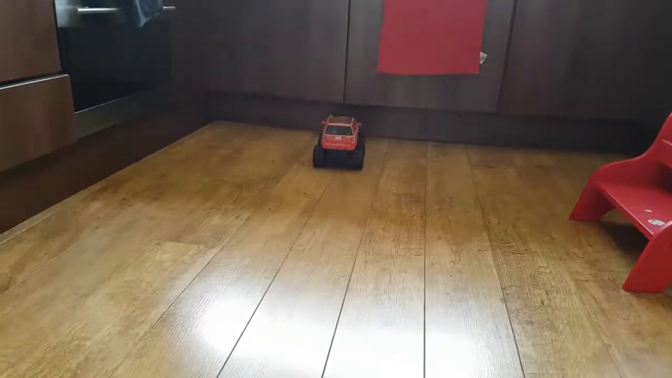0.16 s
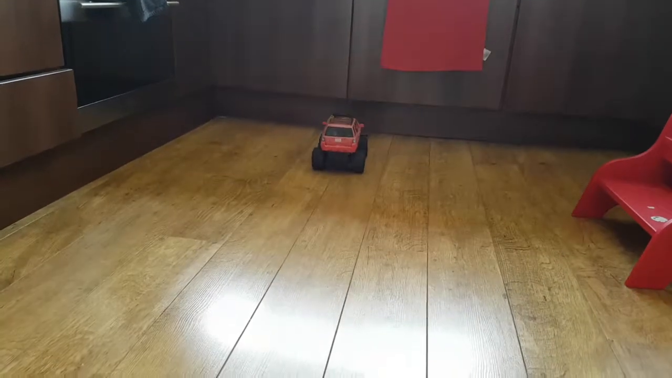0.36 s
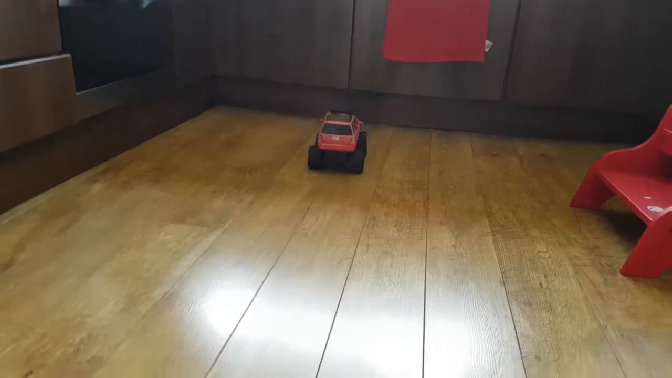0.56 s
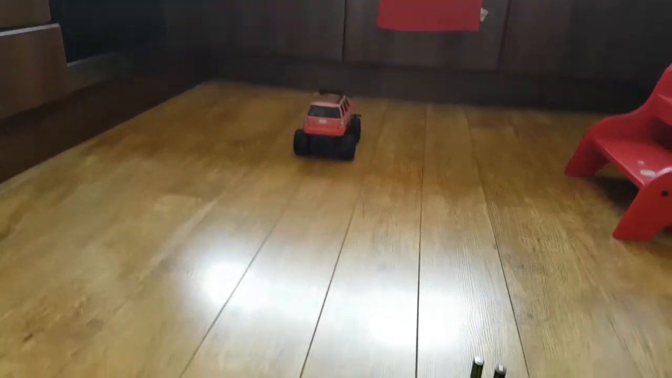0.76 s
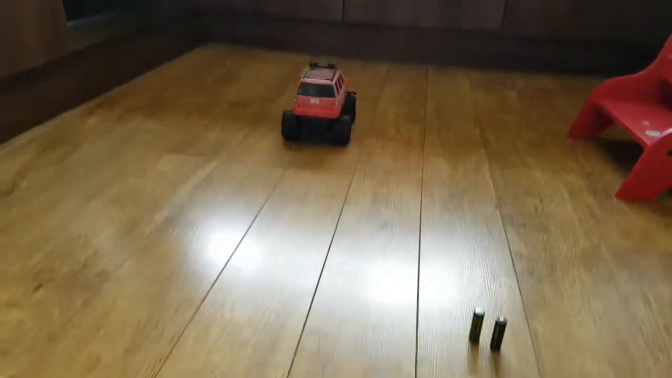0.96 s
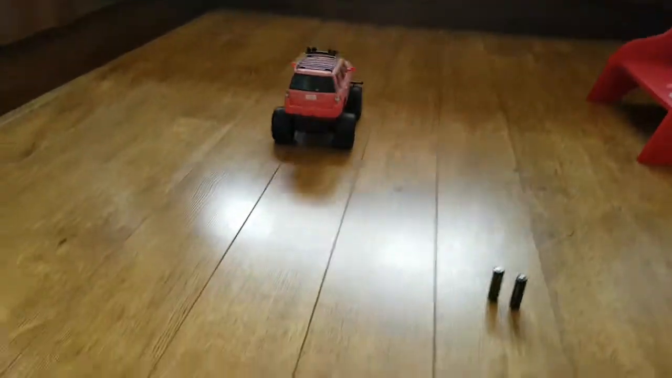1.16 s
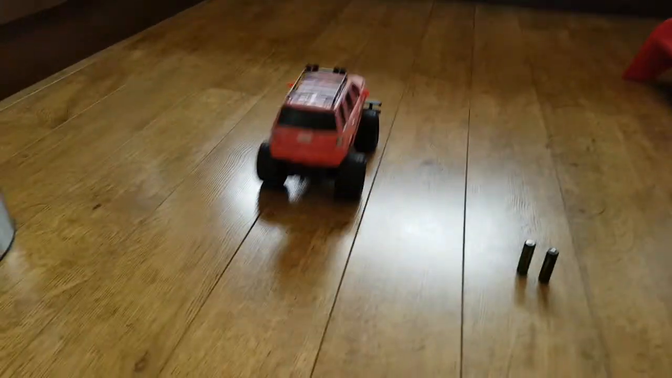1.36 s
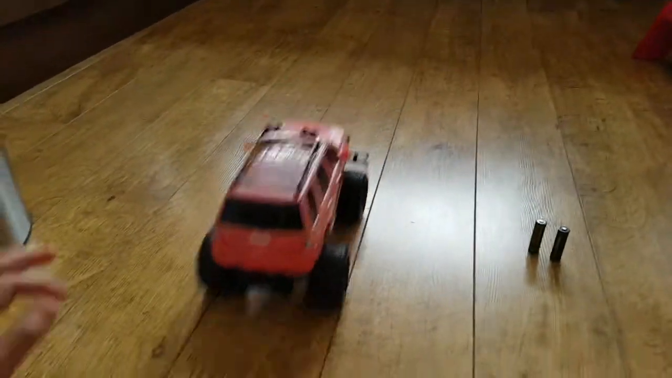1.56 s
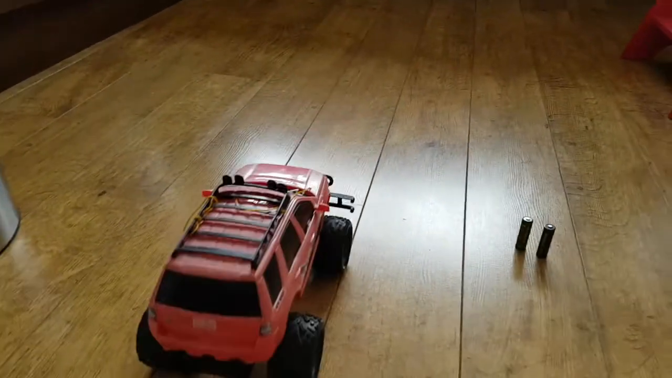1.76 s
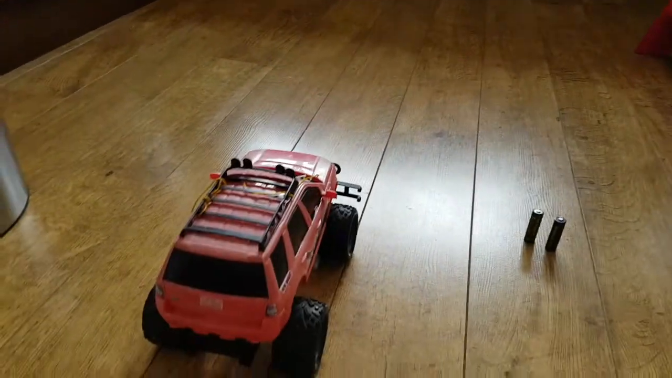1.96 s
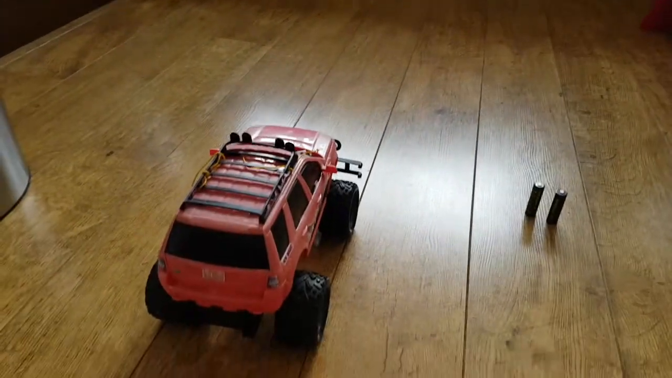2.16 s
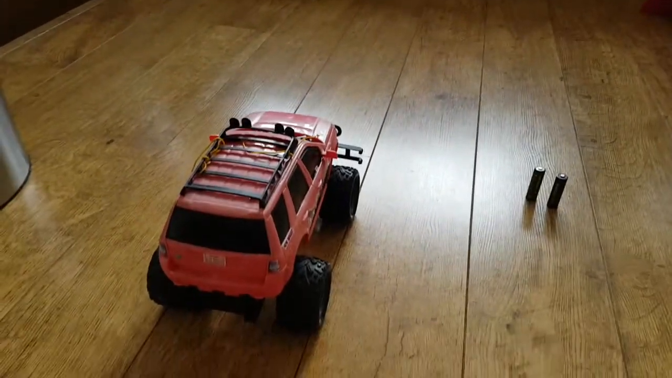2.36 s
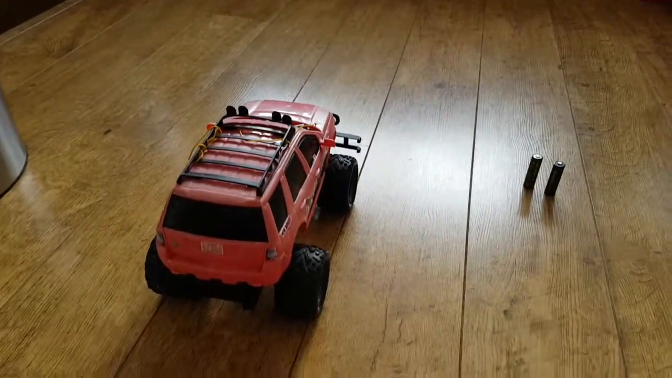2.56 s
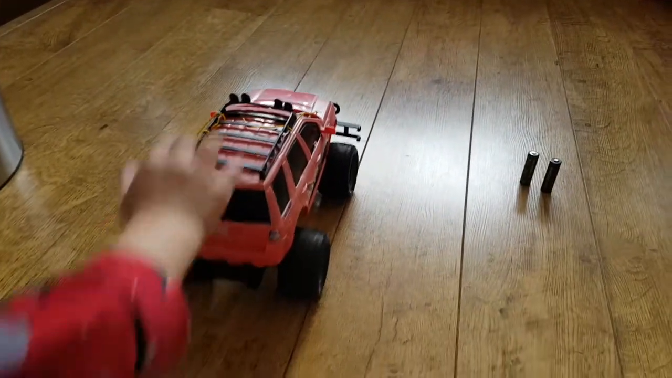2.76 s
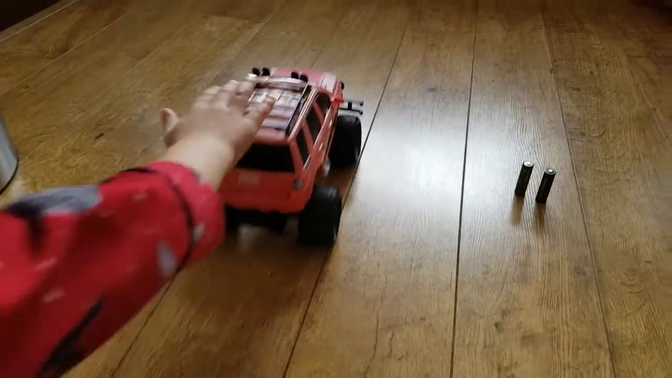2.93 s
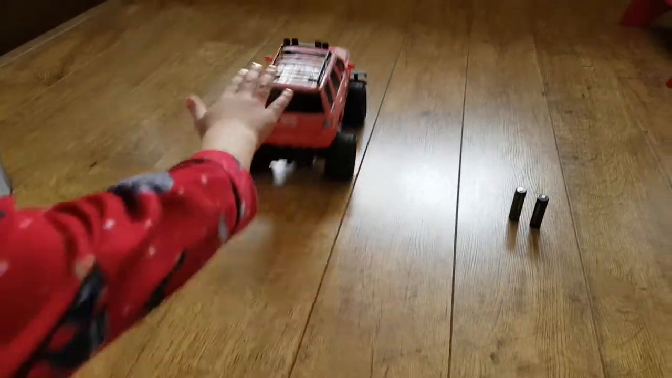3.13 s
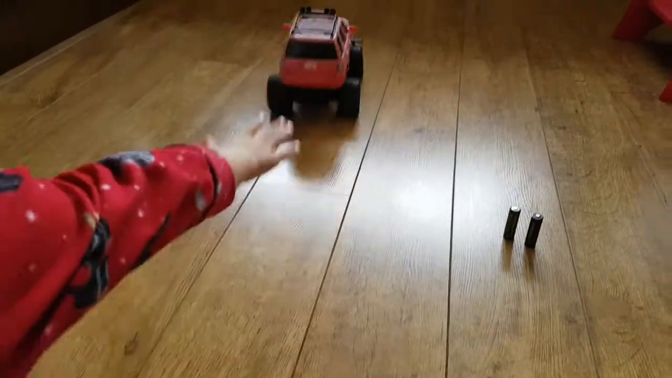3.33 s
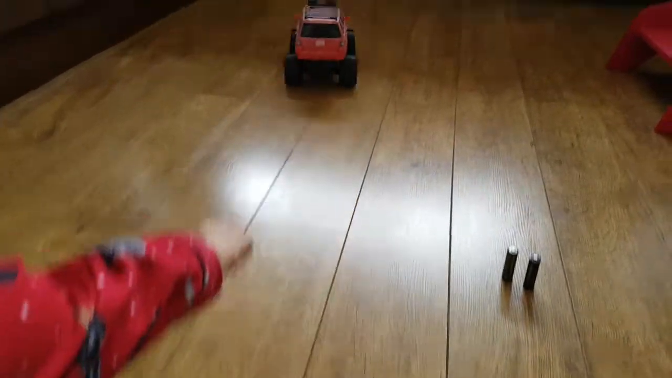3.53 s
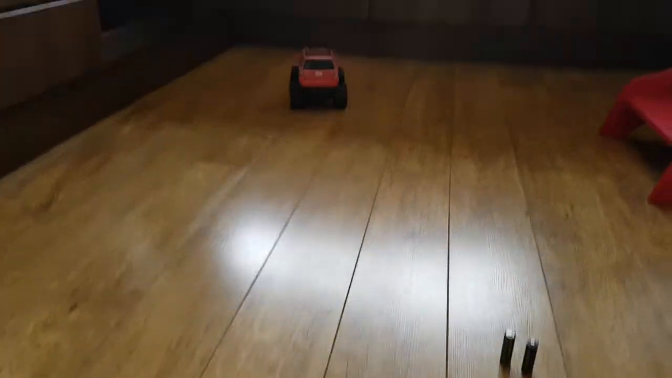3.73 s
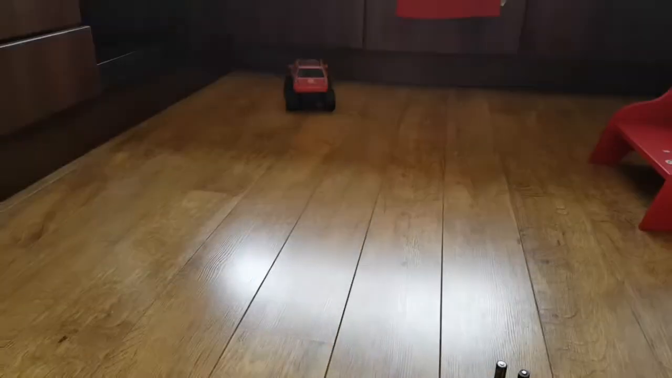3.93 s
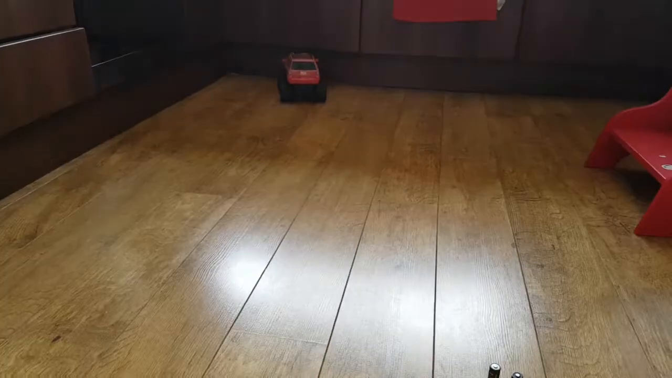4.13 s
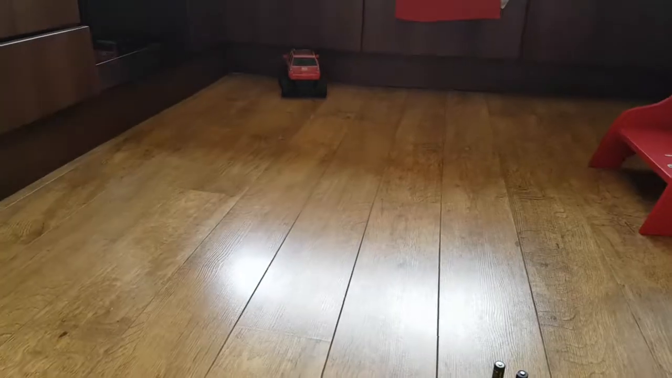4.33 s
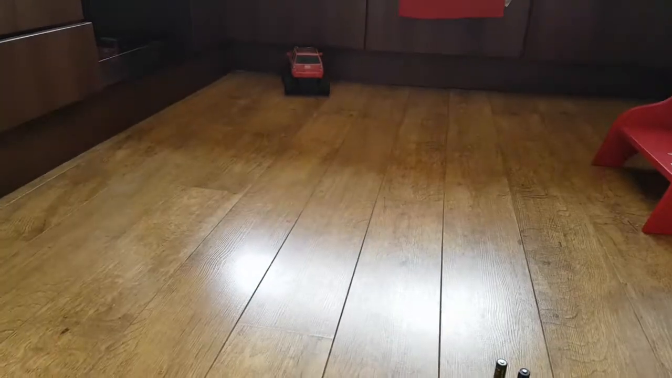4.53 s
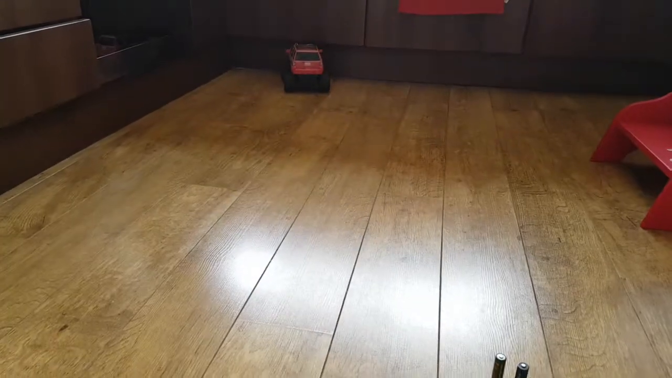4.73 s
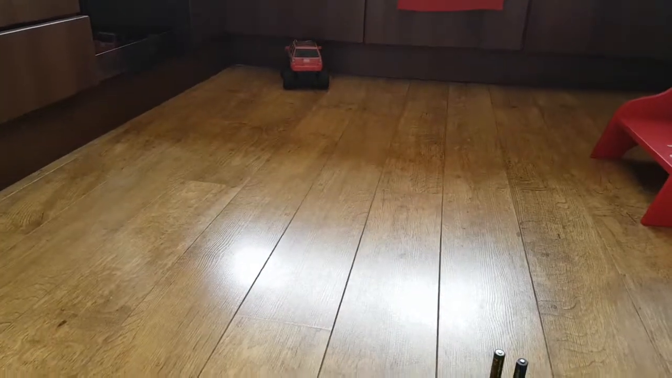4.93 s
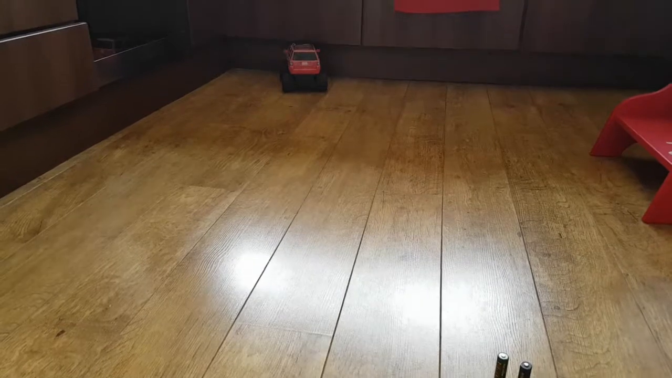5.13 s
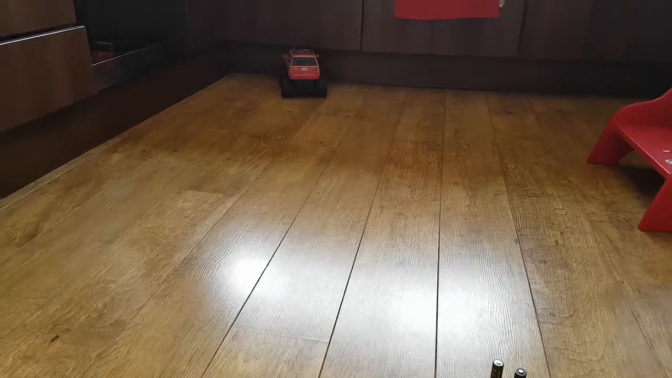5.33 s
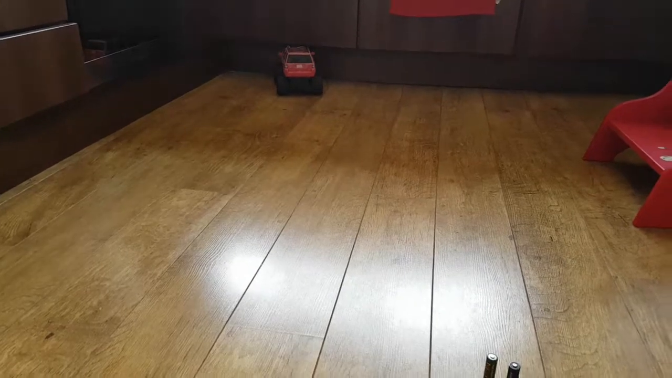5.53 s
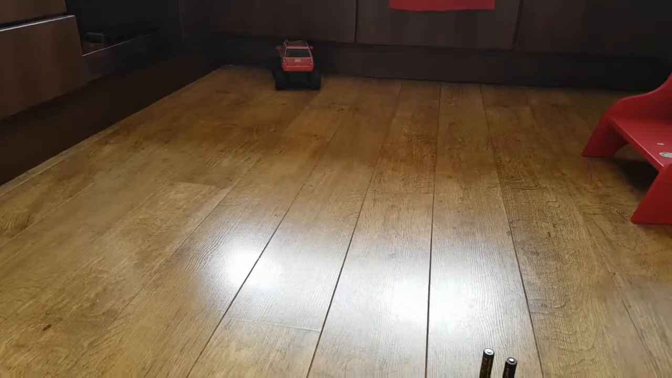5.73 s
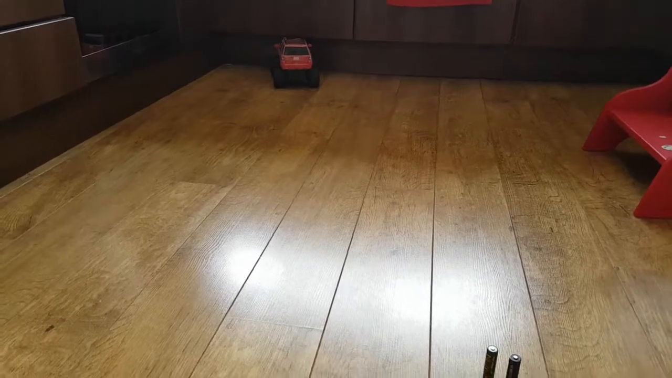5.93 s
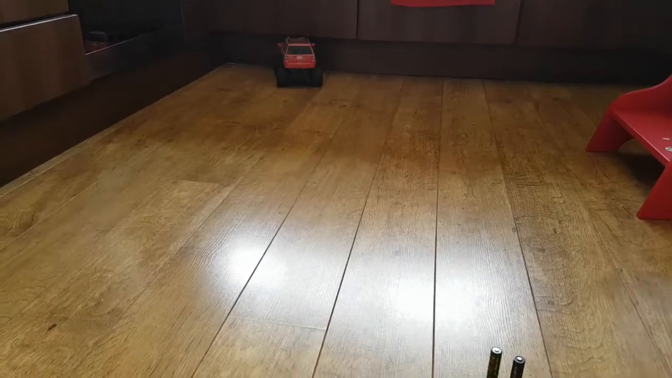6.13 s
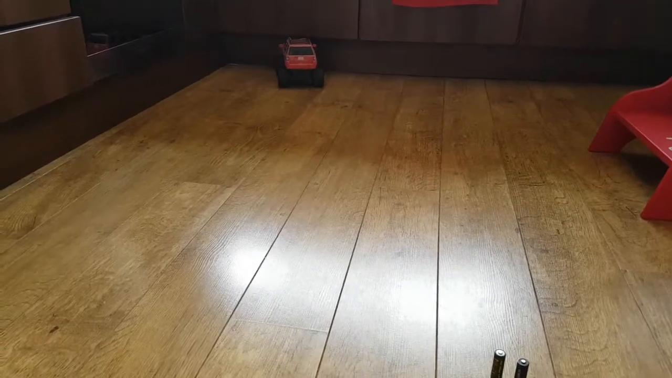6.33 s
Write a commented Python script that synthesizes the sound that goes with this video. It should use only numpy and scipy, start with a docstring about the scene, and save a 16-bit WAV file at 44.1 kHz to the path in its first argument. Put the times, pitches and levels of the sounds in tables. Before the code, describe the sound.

A toy truck's electric motor gives four quick blips, then whirs closer over a wooden kitchen floor, plastic gears chattering and tyres rumbling softly. It clacks and coasts to a stop with a slight squeal. After a pause it drives away with a rising whine and a brief whistle, then winds down. Faint sleeve rustles, ticks and dull thumps follow, heard in a small room, slightly to the left.

```python
"""A kitchen with a wooden floor. A toy radio-controlled truck gives four short blips, backs closer,
coasts to a stop with a squealing axle, then drives off with a whistling gear. Its plastic gears chatter
and whine in the hollow shell, louder with speed and throttle; the motor hums and the tyres rumble.
The drive clacks as it takes up slack. A sleeve brushes the floor, and light ticks, soft scuffs and
dull thumps on the boards end the scene."""
import sys
import numpy as np
from scipy import signal
from scipy.fft import rfft, irfft, next_fast_len
from scipy.io import wavfile
from scipy.ndimage import map_coordinates

SR = 44100
rng = np.random.default_rng(int(sys.argv[2]) if len(sys.argv) > 2 else 0)


def generate_wav(sig):
    """Save sig (samples, or channels by samples) to the path in sys.argv[1] as 16-bit PCM at SR."""
    pcm = np.round(np.clip(np.atleast_2d(sig).T, -1, 1) * 32767).astype(np.int16)
    wavfile.write(sys.argv[1], SR, pcm)


N = 281799

# The throttle: four blips, two long presses. Each row: on and off in seconds, added gear level in dB.
PRESSES = [(.045, .15, 3), (.245, .325, 4.5), (.435, .55, 5.5), (.61, .735, 4), (0.801, 1.337, 5.5),
           (2.66, 3.6, 3)]
# How fast the gear teeth meet in the two long runs. Each row: time in seconds, tooth rate in Hz.
RUN_IN = [(.79, 1051), (.84, 1599), (1.0, 1799), (1.13, 1797), (1.25, 1910), (1.31, 1902), (1.365, 1331),
          (1.48, 1281), (1.55, 876), (1.63, 722), (1.71, 451.8), (1.81, 260.2)]
RUN_OUT = [(2.66, 399.6), (2.75, 559), (2.87, 690.6), (3.07, 1236), (3.22, 1351), (3.42, 1687),
           (3.61, 1928), (3.67, 1379), (4.09, 884.2), (4.25, 579.2), (4.31, 370.8), (4.48, 211)]
# The gears with the throttle off. Each row: tooth rate in Hz, level in dB.
GEAR_LOUDNESS = [(200, -72.5), (400, -53), (600, -43), (800, -37), (1100, -31.5), (1400, -30), (1900, -28)]
# Backing in and driving off use opposite sides of the teeth. Each row: start and stop in seconds, then
# in dB against the chatter: rasp, sizzle, extra treble under load, hum, extra whine under load.
TRIPS = [(0, 1.81, -5.5, -5.5, 3, -11, -4), (2.66, 4.5, -4.5, -6, -1.04, -19.5, 2)]
# The tone colour of the truck's parts. Each row: frequency in Hz, level in dB.
SHELL_COLOUR = [(200, -41), (340, -9.5), (520, -11), (650, -11), (930, -8), (1300, -3), (1700, -4),
                (2050, -0.5), (2650, -6), (3200, -15.5), (4100, -19), (5200, -25), (9000, -56)]  # the broad ring of the plastic shell
GEARBOX_COLOUR = [(1500, -29.5), (2400, -10), (2900, 10), (3300, 3.5), (3800, -4), (4300, -13.5),
                  (5000, -13.5), (8000, -40)]  # a narrow, rasping ring
SIZZLE_COLOUR = [(1500, -45), (3000, -14.5), (4200, 0), (5200, 3.5), (6500, 3), (7800, 1), (8800, -9),
                 (10200, -7.5), (12500, -1.5), (14000, -7), (16000, -13.5)]  # the bright ring of hard tooth contacts
TYRE_COLOUR = [(40, -32.5), (80, -7.5), (115, -3.5), (150, -9.5), (210, -6.5), (270, -21.5), (500, -19.5),
               (1000, -46.5)]  # a low rumble
# Notes at which the body panels ring. Each row: frequency in Hz, width in Hz, boost in dB.
PANEL_NOTES = [(618, 43, 6), (1332, 34, 3.5), (1568, 23, 4), (1693, 64, 5.5), (1920, 55, 5), (2850, 60, 3),
               (3090, 86, 3), (3590, 120, 2), (4040, 43, 2.5), (7800, 180, 2)]
# The shell favours some pitches of the whine. Each row: tooth rate in Hz, level in dB.
WHINE_LEVELS = [(450, -7), (600, -3), (760, -1), (900, -10.5), (1150, -7), (1310, 2), (1500, -2),
                (1680, -1), (1900, -1.5)]
# How far off the truck is, used for the whine. Each row: time in seconds, distance in metres.
DISTANCE = [(0, 1.7), (.75, 1.2), (1.6, 0.19), (2.95, 0.4), (3.25, 0.66), (3.8, 1.89), (4.3, 1.67)]
# Tyres rolling on the boards. Each row: time in seconds, level in dB.
TYRE_LEVELS = [(0, -66), (.06, -53), (1.0, -51), (1.4, -47.5), (1.75, -56.5), (1.81, -71), (2.66, -60.5),
               (2.88, -47.5), (3.62, -50.5), (3.73, -43.5), (4.14, -51.5), (4.45, -73.5)]
# Plastic clacks and ticks. Each row: start in seconds, level in dB, treble offset in dB,
# seconds to fade by 60 dB.
CLACKS = [(.053, -21, -16, 0.086), (.247, -21, -16, 0.089), (.435, -19.5, -15, 0.08), (.8, -20, -13, 0.075),
          (1.422, -20.5, -24.5, .06), (1.522, -18.5, -20, 0.052), (1.814, -45, -20.5, 0.13),
          (2.452, -43.5, -12.5, 0.017), (2.547, -38.5, -22, .02), (2.658, -30.5, -24, 0.062),
          (2.664, -29, -14.5, 0.028), (4.259, -34.5, -25, .03), (4.335, -32.5, -23, 0.02),
          (4.394, -48.5, -27, 0.029), (4.538, -58, -8, 0.0136), (5.026, -40, -16.5, 0.022),
          (5.551, -41, -23, 0.027), (5.578, -40, -18, 0.0211), (5.732, -37, -21.5, 0.0193),
          (6.164, -48, -21, 0.056), (6.346, -52, -21, 0.11)]
# The axle's squeal and the gear's whistle. Each row: time in seconds, pitch in Hz, level in dB.
AXLE_SQUEAL = [(1.53, 2100, -62), (1.585, 2190, -46), (1.65, 2315, -42.5), (1.69, 2380, -46.5),
               (1.74, 2300, -55), (1.79, 2200, -78)]
GEAR_WHISTLE = [(2.9, 2984, -61), (2.97, 3168, -37.5), (3.05, 3420, -40), (3.125, 4092, -36),
                (3.3, 4170, -41), (3.37, 4190, -66)]
# The tones that make up the squeal. Each row: multiple of the pitch, level in dB.
AXLE_TONES = [(1, -2.5), (2, -14), (3, -9), (5.5, -3)]
# Strokes of a sleeve on the floor. Each row: start and end in seconds, level in dB.
BRUSHES = [(2.57, 2.633, -60.5), (5.0, 5.11, -63), (5.271, 5.42, -73.5), (5.42, 5.647, -64),
           (5.738, 6.073, -68.5), (6.176, 6.379, -75)]
# Dull thumps. Each row: start in seconds, level in dB.
THUMPS = [(5.042, -43), (5.076, -43.5), (6.026, -34.5), (6.064, -41.5), (6.16, -43)]
# The floorboards' low notes. Each row: pitch in Hz, level in dB, seconds to fade by 60 dB.
BOARD_NOTES = [(60.5, -9.5, 0.37), (77.8, -3, 0.29), (108.1, 1, 0.062), (153, -9, 0.11)]
# Soft scuffs. Each row: middle in seconds, level in dB, half the length in seconds.
SCUFFS = [(5.476, -55, 0.022), (5.607, -55.5, 0.021), (6.374, -64, 0.025)]
# The tone colour of the sleeve, the scuffs and the quiet room. Each row: frequency in Hz, level in dB.
CLOTH_COLOUR = [(300, -4.5), (1200, -0.5), (2500, -1.5), (4500, -5.5), (7500, -6.5), (9500, -14.5),
                (13000, -7), (16000, -12.5)]
SCUFF_COLOUR = [(200, -8), (550, 2), (1000, -6), (1500, -11), (2200, -6), (5000, -16.5), (9000, -35),
                (16000, -37)]
AIR_COLOUR = [(25, -8), (55, -1), (75, -10), (110, -11.5), (150, -15.5), (220, -15), (260, -17),
              (330, -17.5), (600, -24.5), (1500, -30), (4000, -37.5), (9000, -47.5), (13000, -40.5),
              (16000, -46.5)]
# How long the kitchen echoes. Each row: frequency in Hz, seconds to fade by 60 dB.
ECHO_TIMES = [(100, 0.89), (1000, 0.32), (4000, 0.23), (14000, 0.21)]
# How strong the echo is. Each row: frequency in Hz, level in dB against the direct sound.
ECHO_LEVELS = [(100, -17), (300, -6), (700, 0.5), (2000, -3.5), (5000, -0.5), (14000, 4)]
# The sound leans mostly left. Each row: frequency in Hz, left minus right in dB.
LEFT_LEAN = [(100, 0.5), (300, 2), (600, 1.65), (1400, 2.3), (2800, 1.5), (5000, -0.5), (9000, -3),
             (13000, 4)]

CREEP_HZ, BLIP_HZ, BLIP_STEP_HZ = 569.3, 1496, 85  # tooth rate: at the start, first blip's aim, step up
FULL_SPEED_HZ, TEETH_PER_HUM = 1800, 4.47  # tooth rate at full speed; teeth per cycle of the motor's hum
# Growth with speed; one octave is a doubling of the tooth rate.
RASP_DB_PER_OCTAVE, SIZZLE_DB_PER_OCTAVE, WHINE_DB_PER_OCTAVE, HUM_DB_PER_OCTAVE = 1.1, 4, 3, 29.5
STRAIN_DB_PER_OCTAVE = 2  # a slower motor pushes harder
NEAR_M, WHINE_LOSS_DB_PER_M = 0.65, 7.5  # further off, the coasting whine sinks into the chatter
AIR_DB, TOP_HZ = -60, 15900


def amp(db):
    """Turn decibels into a number to multiply by."""
    return 10 ** (np.asarray(db) / 20)


def unit(x):
    """Scale a signal to an average power of 1."""
    return x / np.sqrt(np.mean(x ** 2) + 1e-20)


def along(points, hz):
    """Look up a table at any frequency, sliding between its rows on a pitch scale."""
    freqs, values = np.transpose(points)
    return np.interp(np.log(hz + 1), np.log(freqs + 1), values)


def curves(rows):
    """Turn each column after the time into a curve with one value per sample."""
    times, *columns = np.transpose(rows)
    return [np.interp(np.arange(N) / SR, times, column) for column in columns]


def wobble(rate):
    """A smooth random curve through `rate` new values a second."""
    values = rng.standard_normal(int(N * rate / SR) + 4)
    return unit(map_coordinates(values, [np.arange(N) * rate / SR]))


def held(start, end, rise_s, fall_s):
    """A level that climbs towards 1 from start and dies away after end."""
    t = np.arange(N) / SR
    rise = 1 - np.exp(-np.clip(t - start, 0, max(end - start, 0)) / rise_s)
    return rise * np.exp(-np.maximum(t - end, 0) / fall_s)


def stereo_noise(size, width):
    """Noise for two ears: the same in both at width 0, unrelated at width 1."""
    mid, side = rng.standard_normal((2, size))
    return np.array([mid + width * side, mid - width * side])


def filtered(x, response):
    """Turn each frequency up or down by the gain that response gives for it."""
    size = next_fast_len(N + SR // 2)
    return irfft(rfft(x, size) * response(np.fft.rfftfreq(size, 1 / SR)), size)[..., :N]


def ring(x, colour, notes=(), size=4096):
    """Let x shake a body that has a broad tone colour and, if given, sharp ringing notes."""
    f = np.fft.rfftfreq(size, 1 / SR)
    notes_db = sum(db / (1 + (2 * (f - hz) / width) ** 2) for hz, width, db in notes)
    cepstrum = irfft(np.log(amp(along(colour, f) + notes_db)))
    # Folding this onto its first half makes the body ring after a blow, never before.
    cepstrum[1:size // 2] *= 2
    cepstrum[size // 2 + 1:] = 0
    body = irfft(np.exp(rfft(cepstrum)))
    return signal.fftconvolve(np.atleast_2d(x), body[None] / np.linalg.norm(body), axes=1)[:, :N]


def tooth_rate():
    """Teeth meeting per second: each blip spins the motor up and lets it slow; two long runs follow."""
    t = np.arange(N) / SR
    blips = [(on, off) for on, off, _ in PRESSES if off - on < .3]
    rates = [(BLIP_HZ + k * BLIP_STEP_HZ) * held(on, off, rise_s=.036, fall_s=.14)
             for k, (on, off) in enumerate(blips)]
    rates += [np.interp(t, *np.transpose(run), left=0, right=0) for run in (RUN_IN, RUN_OUT)]
    rates.append(np.where(t < RUN_IN[0][0], CREEP_HZ, GEAR_LOUDNESS[0][0]))  # the slowest allowed
    return np.max(rates, axis=0)


def tooth_blows(teeth_passed, scatter, uneven_db, rebound, lag_s):
    """One blow per tooth, early or late and of uneven size; loose teeth strike again on their backs."""
    teeth = np.arange(1, int(teeth_passed[-1]))
    blows = np.zeros((2, N))
    for offset, force in (0, 1), (.5, -rebound):
        when, size, place = rng.standard_normal((len(teeth), 3)).T
        at = np.interp(teeth + offset + scatter * when if offset == 0 else teeth + offset + when,
                       teeth_passed, np.arange(N))
        # Each blow leaves the shell at another spot, so one ear hears it about lag_s sooner.
        for ear, side in enumerate((.5, -.5)):
            arrival = np.clip(at + side * lag_s * SR * place, 0, N - 1).astype(int)
            blows[ear] += force * np.bincount(arrival, amp(uneven_db * size), N)
    return unit(blows / np.sqrt(np.abs(np.gradient(teeth_passed)) + 1e-6))  # equal power at any speed


def gear_whine(teeth_passed, tooth_hz, throttle):
    """The note of the meeting teeth: clearest when coasting close by, blurred by load and distance."""
    beyond_m = np.maximum(curves(DISTANCE)[0] - NEAR_M, 0)
    blur = .4 + .8 * throttle + .5 * beyond_m
    jitter = wobble(300) + .5 * np.array([wobble(250), wobble(250)])
    phase = 2 * np.pi * teeth_passed + blur * jitter
    tones = np.sin(phase) + amp(-12.5) * np.sin(2 * phase) + amp(-17.5) * np.sin(3 * phase)
    flutter = amp(3 * wobble(130) + 2 * wobble(30))
    loss_db = WHINE_LOSS_DB_PER_M * beyond_m * (1 - throttle)
    return amp(along(WHINE_LEVELS, tooth_hz) - loss_db) * unit(tones * flutter)


def motor_hum(tooth_hz):
    """The motor hums one cycle for every few teeth, and its level wavers."""
    phase = 2 * np.pi * np.cumsum(tooth_hz / TEETH_PER_HUM) / SR + .55 * wobble(110)
    return unit((np.sin(phase) + amp(-13) * np.sin(2 * phase)) * amp(1.8 * wobble(55)))


def tyre_rumble():
    """Tyres roll over the boards with a low, uneven noise."""
    bumps = stereo_noise(N, width=.091) * amp(.82 * wobble(35))
    return amp(curves(TYRE_LEVELS)[0]) * unit(ring(bumps, TYRE_COLOUR))


def drive():
    """Gears and motor, louder and brighter with speed and throttle, over the rumbling tyres."""
    tooth_hz = tooth_rate()
    octaves = np.log2(tooth_hz / FULL_SPEED_HZ)
    presses = np.array([held(on, off, rise_s=.014, fall_s=.031) for on, off, _ in PRESSES])
    throttle = presses.sum(axis=0)
    load_db = np.array(PRESSES)[:, 2] @ presses - STRAIN_DB_PER_OCTAVE * octaves * throttle
    gear_db = along(GEAR_LOUDNESS, tooth_hz) + load_db
    trip_levels = [(s, *row[2:]) for row in TRIPS for s in row[:2]]
    rasp_db, sizzle_db, treble_db, hum_db, whine_db = curves(trip_levels)
    rasp_db += RASP_DB_PER_OCTAVE * octaves
    sizzle_db += SIZZLE_DB_PER_OCTAVE * octaves
    whine_db += WHINE_DB_PER_OCTAVE * octaves
    hum_db += HUM_DB_PER_OCTAVE * octaves
    teeth_passed = np.cumsum(tooth_hz * (1 + .016 * wobble(45))) / SR
    # An off-centre gear of 26 teeth presses harder once a turn, and the load flutters.
    flutter_db = .64 * np.sin(2 * np.pi * teeth_passed / 26) + 1.1 * wobble(60)
    blows = tooth_blows(teeth_passed, scatter=.32, uneven_db=3, rebound=.9, lag_s=.00006)
    chatter = amp(flutter_db) * unit(ring(blows, SHELL_COLOUR, PANEL_NOTES))
    rasp = amp(rasp_db + flutter_db) * unit(ring(blows, GEARBOX_COLOUR, PANEL_NOTES))
    sizzle = amp(sizzle_db + .79 * flutter_db) * unit(ring(blows, SIZZLE_COLOUR, PANEL_NOTES))
    treble = amp(treble_db * throttle) * (rasp + sizzle)
    whine = amp(whine_db * throttle) * gear_whine(teeth_passed, tooth_hz, throttle)
    hum = amp(hum_db) * motor_hum(tooth_hz)
    moving = sum(held(start, stop, rise_s=.003, fall_s=.01) for start, stop, *_ in TRIPS)
    return moving * (amp(gear_db) * (chatter + treble + whine + hum) + tyre_rumble())


def clacks():
    """Plastic parts knock together in a quick flurry that rings the shell and the gearbox."""
    t = np.arange(SR // 5) / SR
    knock, snap = np.zeros((2, 2, N + SR))
    for start, db, treble_db, fade_s in CLACKS:
        flurry = stereo_noise(len(t), width=.22) * amp(-60 * t / fade_s) * (1 - np.exp(-t / .0048))
        span = slice(round(start * SR), round(start * SR) + len(t))
        knock[:, span] += amp(db + 3) * flurry
        snap[:, span] += amp(db + treble_db + 11) * flurry
    shell = ring(knock, SHELL_COLOUR, PANEL_NOTES)
    gearbox = amp(-5) * ring(knock, GEARBOX_COLOUR, PANEL_NOTES)
    return shell + gearbox + ring(snap, SIZZLE_COLOUR)


def squeal(track, tones, roughness):
    """Dry plastic sticks and slips, making a hoarse tone."""
    pitch_hz, db = curves(track)
    phase = 2 * np.pi * np.cumsum(pitch_hz * (1 + roughness * wobble(700))) / SR
    t = np.arange(N) / SR
    sounding = (t > track[0][0]) & (t < track[-1][0])
    tone = sum(amp(level) * np.sin(k * phase) * amp(6 * wobble(200)) for k, level in tones)
    return amp(db) * sounding * unit(tone)


def sleeve_brushes():
    """Cloth slides along the floor with a flickering hiss."""
    strokes = sum(amp(db) * held(start, end, rise_s=.04, fall_s=.035) for start, end, db in BRUSHES)
    return ring(strokes * amp(2 * wobble(76)) * stereo_noise(N, width=.8), CLOTH_COLOUR)


def thumps():
    """Soft, heavy bumps ring the low notes of the floorboards."""
    t = np.arange(SR // 2) / SR
    out = np.zeros(N + SR)
    for start, db in THUMPS:
        boom = sum(amp(level + rng.normal(0, 3) - 60 * t / fade_s) * np.sin(2 * np.pi * hz * t)
                   for hz, level, fade_s in BOARD_NOTES)
        out[round(start * SR):][:len(t)] += amp(db) * boom * (1 - np.exp(-t / .0045))
    return out[:N]


def scuffs():
    """Brief, soft rubs on the floor: noise that swells and fades."""
    t = np.arange(N) / SR
    strokes = sum(amp(db) * np.exp(-((t - middle) / half) ** 2) for middle, db, half in SCUFFS)
    return ring(strokes * stereo_noise(N, width=.58), SCUFF_COLOUR)


def echo_tails(count):
    """Random stereo echoes from floor and cupboards; low notes last longest."""
    hz, t, noise = signal.stft(rng.standard_normal((count, 2, SR // 3)), SR, nperseg=256)
    near_walls = 1.9 * np.exp(-t / .0027)  # these answer first
    fade = amp(-60 * t / along(ECHO_TIMES, hz)[:, None]) + near_walls
    tails = signal.istft(noise * fade / np.linalg.norm(fade, axis=1, keepdims=True), SR, nperseg=256)[1]
    return tails / np.linalg.norm(tails, axis=-1, keepdims=True)


def kitchen(x, size=4096):
    """Add the room's echo. Its paths change as things move, so each short slice gets its own."""
    starts = np.arange(0, N + size, size)
    window = np.sin(np.pi * np.arange(2 * size) / (2 * size))
    padded = np.pad(x, ((0, 0), (size, 3 * size)))
    echo = np.zeros((2, N + SR))
    for start, tail in zip(starts, echo_tails(len(starts))):
        answer = signal.fftconvolve(window * padded[:, start:start + 2 * size], tail, axes=1)
        echo[:, start:start + answer.shape[1]] += answer
    echo_gain = lambda f: amp(along(ECHO_LEVELS, f))
    direct = filtered(x, lambda f: 1 / np.hypot(1, echo_gain(f)))
    return direct + filtered(echo[:, size:size + N], lambda f: echo_gain(f) / np.hypot(1, echo_gain(f)))


def room_air():
    """The quiet room: a low rumble shared by both ears, under a hiss that is separate in each."""
    shared, apart = rng.standard_normal((2, N))
    apart = filtered(apart, lambda f: along([(60, .12), (300, .53), (2000, 1)], f))
    noise = np.array([shared + apart, shared - apart])
    return amp(AIR_DB) * unit(filtered(noise, lambda f: amp(along(AIR_COLOUR, f))))


def scene():
    """The truck and the small noises in the kitchen, a little to the left."""
    axle = squeal(AXLE_SQUEAL, AXLE_TONES, roughness=.035)
    whistle = squeal(GEAR_WHISTLE, tones=[(1, 0), (1.5, -12)], roughness=.018)
    truck = drive() + clacks() + axle + whistle
    sound = kitchen(truck + sleeve_brushes() + scuffs() + thumps())
    ear_gains = lambda f: amp(np.outer([.5, -.5], along(LEFT_LEAN, f)))
    return amp(2) * filtered(sound, ear_gains) + room_air()


def record(dry):
    """Cut away the highest treble, above TOP_HZ."""
    return filtered(dry, lambda hz: hz < TOP_HZ)


dry = scene()
out = record(dry)
generate_wav(out)
```